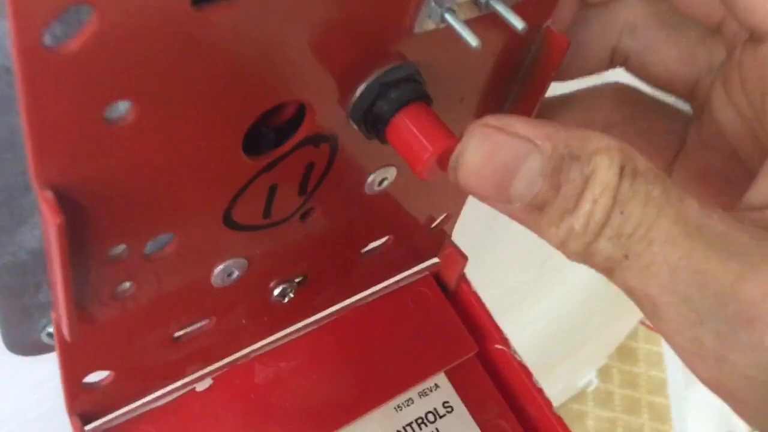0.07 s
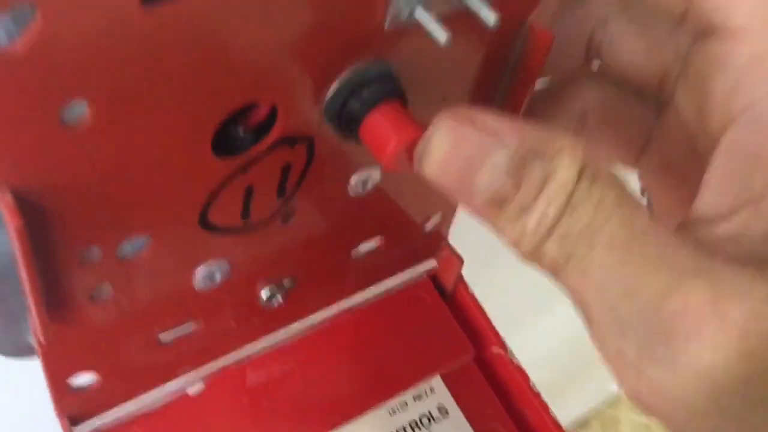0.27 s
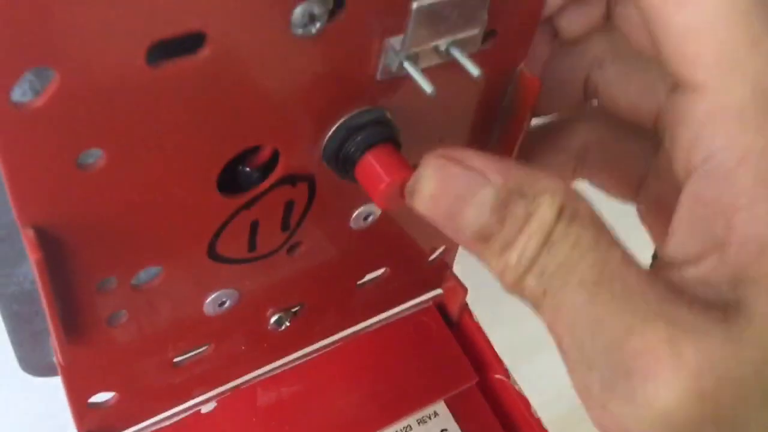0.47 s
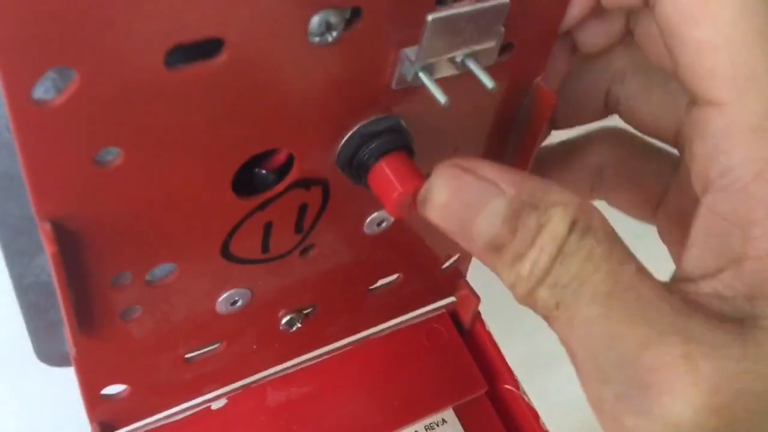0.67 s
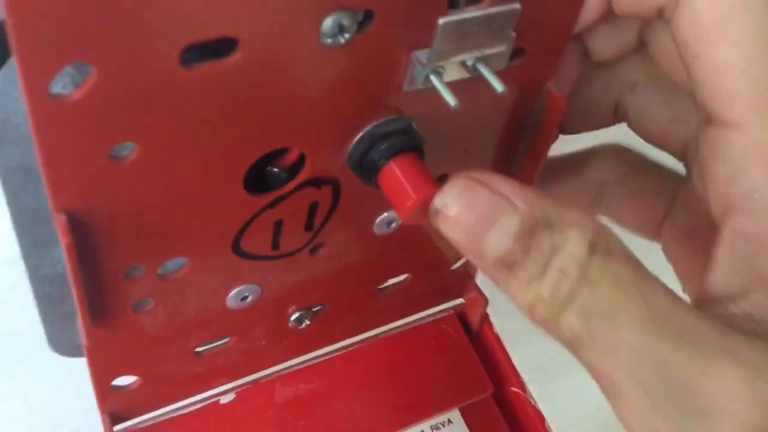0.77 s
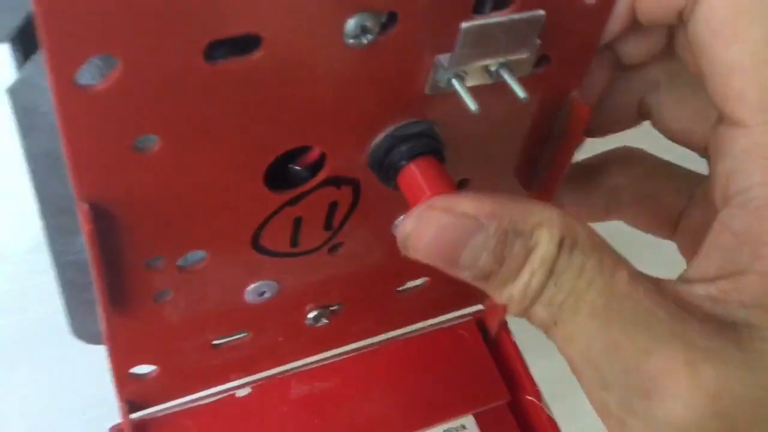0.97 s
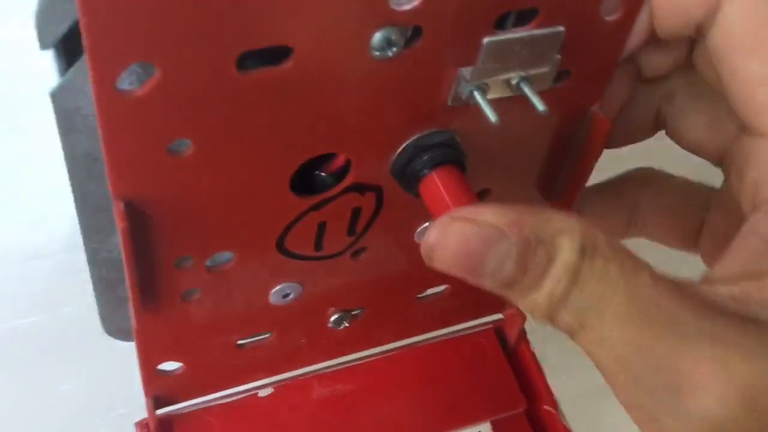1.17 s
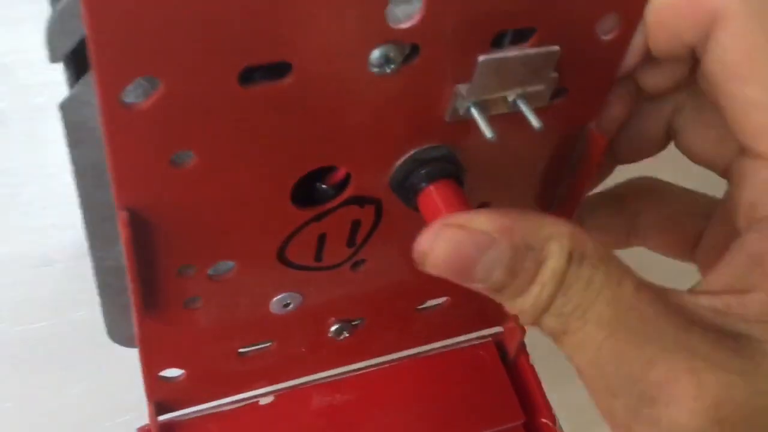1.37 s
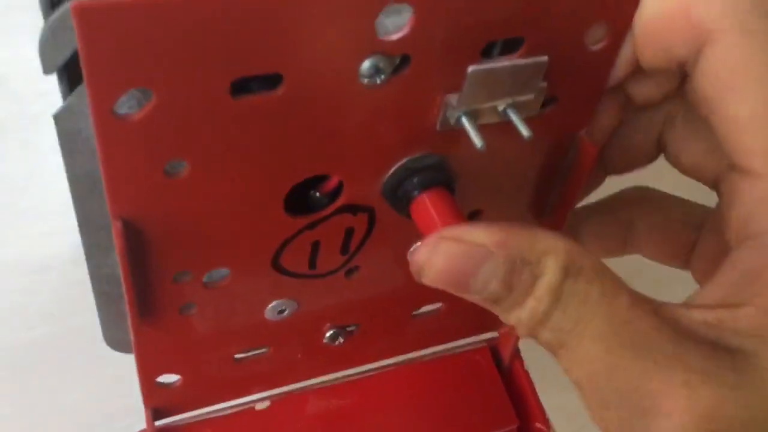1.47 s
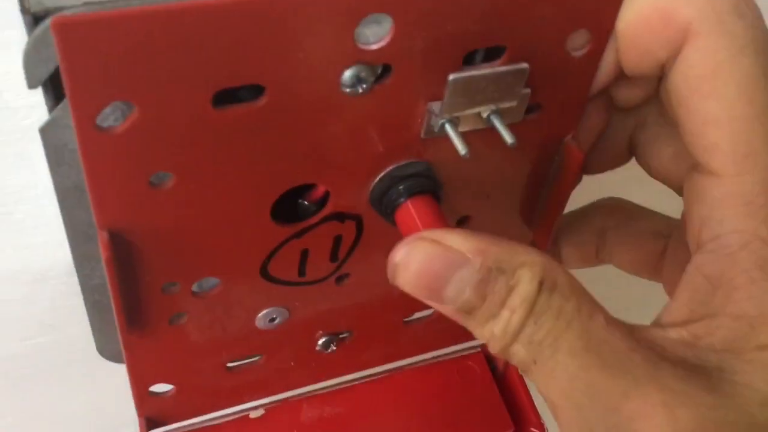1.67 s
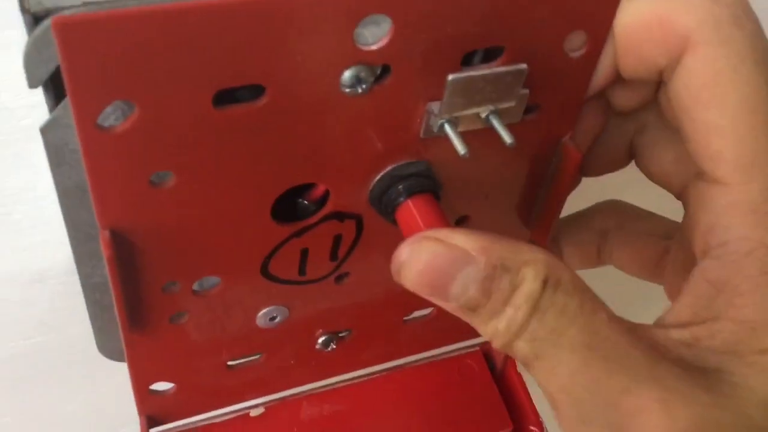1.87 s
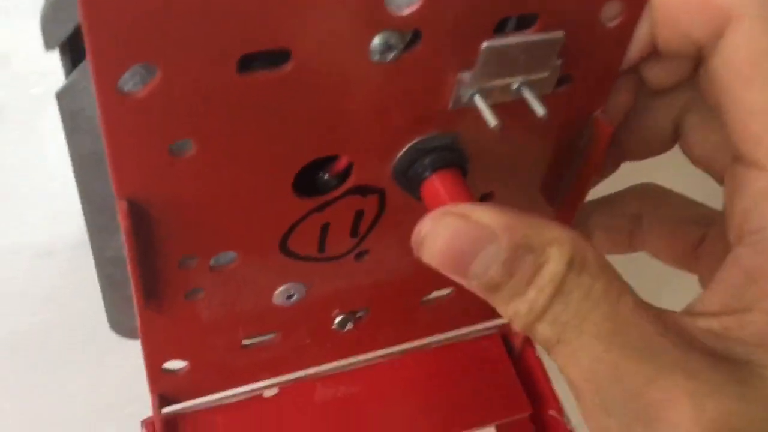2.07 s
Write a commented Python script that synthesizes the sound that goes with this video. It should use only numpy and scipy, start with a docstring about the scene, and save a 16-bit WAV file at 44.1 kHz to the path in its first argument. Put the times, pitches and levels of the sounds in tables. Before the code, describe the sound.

A small spring-loaded push button clicks down and up ten times in quick succession.

```python
"""A small room, close on a hand-held sheet-metal box: a thumb works its spring-loaded button ten times.
The contact snaps with a ringing click going down and a brighter, drier one coming up. Each snap
knocks the panel and thumps the box, and each release leaves the coil spring sizzling faintly.
Now and then the thumb taps the plunger. A short room tail and a low room tone sit behind it all."""
import sys
import numpy as np
from scipy import signal
from scipy.fft import rfft, irfft
from scipy.io import wavfile

SR = 44100
rng = np.random.default_rng(int(sys.argv[2]) if len(sys.argv) > 2 else 0)


def master(y):
    """Save y as 16-bit WAV."""
    cut = np.clip(np.atleast_2d(y).T, -1, 1)
    pcm = np.round(cut * 32767)  # scale
    wavfile.write(sys.argv[1], SR, pcm.astype(np.int16))


N = 94021
AGE = np.arange(SR // 4) / SR   # seconds since a blow


def from_db(db):
    """Decibels to gain."""
    return 10 ** (np.asarray(db) / 20)


def at_hz(points, hz):
    """Read a curve on a log-frequency axis."""
    point_hz, value = np.transpose(points)
    return np.interp(np.log(np.maximum(hz, 1)), np.log(point_hz), value)


def at_level(x, db):
    """Scale a blow so that its energy, packed into 10 ms, has this rms level."""
    return x * from_db(db) / np.sqrt(np.sum(x ** 2) / (SR / 100))


def add(out, start_s, sound):
    """Mix a sound in at a time."""
    i = max(int(start_s * SR), 0)
    out[i:i + len(sound)] += sound[:N - i]


def noise(colour, size):
    """Noise of the given colour, rms 1."""
    hz = np.arange(size // 2 + 1) * SR / size
    phases = np.exp(2j * np.pi * rng.random(len(hz)))
    x = irfft(from_db(at_hz(colour, hz)) * phases, size)
    return x / x.std()


def envelope(rise_s, t60, hold_s=0):
    """A linear attack on an exponential decay that starts at hold_s."""
    return np.minimum(AGE / rise_s, 1) * from_db(-60 * np.maximum(AGE - hold_s, 0) / t60)


def ring(modes, rise_s, detune=.002, hold_s=0):
    """One blow on a set of modes; strength, pitch and phase vary a little from blow to blow."""
    out = 0
    for hz, db, t60 in modes:
        gain = from_db(db + 1.1 * rng.normal())
        pitch_hz = hz * (1 + detune * rng.normal())
        phase = .85 * rng.normal()
        out += gain * envelope(rise_s, t60, hold_s) * np.sin(2 * np.pi * pitch_hz * AGE + phase)
    return out


# colour of the room tone: (frequency [Hz], relative density [dB])
ROOM_TONE_COLOUR = [(20, -29.5), (60, -9.5), (131, 0), (179, -25), (355, -12), (461, -26), (700, -14),
                    (822, -26.5), (1760, -40.5), (7470, -43), (16000, -45)]

def room_tone():
    """A steady bed of low rumble with a trace of hiss."""
    return from_db(-59) * noise(ROOM_TONE_COLOUR, N)


# colour of the reverb: (frequency [Hz], gain [dB])
REVERB_COLOUR = [(150, -7.5), (300, -4), (480, -13), (700, -9), (1200, -13), (2100, -16), (2850, -14),
                 (3600, -20.5), (4600, -20), (5750, -21), (7000, -21), (12300, -18.5), (15500, -28)]
# length of the reverb: (frequency [Hz], t60 [s])
REVERB_DECAY = [(150, 0.66), (1000, 0.28), (3000, 0.32), (6000, 0.33), (14000, 0.1)]

def reverb(send, onset_s=.001):
    """The walls return a diffuse tail, each band with its own level and decay."""
    t, tail = np.arange(SR // 2) / SR, 0
    edges_hz = np.linspace(7, 130, 34) ** 2
    for low, high in zip(edges_hz, edges_hz[1:]):
        hz = np.sqrt(low * high)
        bandpass = signal.butter(2, [low, high], "band", fs=SR, output="sos")
        band = signal.sosfilt(bandpass, rng.standard_normal(len(t)))
        band *= np.minimum(t / onset_s, 1) ** 2 * from_db(-60 * t / at_hz(REVERB_DECAY, hz))
        to_unity = np.sqrt(2 * (high - low) / SR / np.sum(band ** 2))
        tail += band * to_unity * from_db(at_hz(REVERB_COLOUR, hz))
    return signal.fftconvolve(send, tail)[:N]


def spring_sizzle(releases, centre_hz=12900, half_width_hz=610):
    """Set free at each release, the coil spring sizzles on, well under the click's treble."""
    out, hz = np.zeros(N), np.fft.rfftfreq(len(AGE), 1 / SR)
    rolloff = np.hypot(1, ((hz - centre_hz) / half_width_hz) ** 2)
    for start_s, _, treble_db, _, _ in releases:
        coils = irfft(rfft(rng.standard_normal(len(AGE))) / rolloff, len(AGE))
        add(out, start_s, at_level(coils * envelope(rise_s=.02, t60=.3), treble_db - 35.5))
    return out


# the thumb meets the plunger: (time [s], level [dB])
THUMB_TAPS = [(0.1458, -32), (0.155, -47), (0.902, -35), (0.923, -43.5), (1.579, -39.5), (1.699, -50.5)]
# colour of a tap: (frequency [Hz], relative density [dB])
THUMB_COLOUR = [(100, 23), (400, 5.5), (1700, 9.5), (3500, 1), (7000, -9.5), (16000, -6)]

def thumb_taps():
    """Dull little taps as the plunger takes up its slack."""
    out = np.zeros(N)
    for start_s, db in THUMB_TAPS:
        tap = noise(THUMB_COLOUR, len(AGE)) * envelope(rise_s=.0014, t60=.047)
        add(out, start_s, from_db(db) * tap)
    return out


# knock of the sheet-metal panel: (frequency [Hz], relative level [dB])
KNOCK_MODES = [(690, -11), (1050, -4), (1189, 2), (1260, -5), (1437, -2), (1660, -5), (1860, -6),
               (2130, -8)]
# thump of the box: (frequency [Hz], relative level [dB], t60 [s])
THUMP_MODES = [(125, -7, .06), (160, -2, .08), (230, 1, .04), (288, 2, .075), (375, -3, .045)]
# the box rocks in the hand: (frequency [Hz], relative level [dB], t60 [s])
ROCK_MODE = [(88.5, 0, 0.039)]
# it rocks more once the grip eases: (time [s], level [dB])
ROCK_LEVEL = [(0.7, -60.5), (1.05, -47)]

def box_body(start_s, knock_db, thump_db, rise_s=.0025, panel_t60=.045, grip_detune=.025):
    """The weight under a click: the panel knocks, the box thumps and rocks in the hand."""
    knock = ring([(hz, db, panel_t60) for hz, db in KNOCK_MODES], rise_s)
    thump = ring(THUMP_MODES, rise_s, grip_detune)
    rock = ring(ROCK_MODE, rise_s=.01, detune=grip_detune)
    rock_db = np.interp(start_s, *np.transpose(ROCK_LEVEL))
    return at_level(knock, knock_db + 3) + at_level(thump, thump_db + 8.5) + at_level(rock, rock_db)


def contact_snaps(cues, modes, crack_colour, crack_db, crack_t60, rise_s):
    """The contact chatters, cracks, rings and jolts the box. Returns direct sound and reverb send."""
    chatter_s, body_lag_s = .0015, .001298
    crossover_hz, treble_fade_db_per_s = 5000, 520
    lowpass = signal.butter(3, crossover_hz, "low", fs=SR, output="sos")
    highpass = signal.butter(3, crossover_hz, "high", fs=SR, output="sos")
    direct, send = np.zeros((2, N))
    for start_s, ring_db, treble_db, knock_db, thump_db in cues:
        # the crack stands for the dense, quickly dying modes of the small parts
        crack = from_db(crack_db) * noise(crack_colour, len(AGE)) * envelope(rise_s, crack_t60, chatter_s)
        tone = ring(modes, rise_s, hold_s=chatter_s)
        body = box_body(start_s, knock_db, thump_db)
        for bus, tone_db in ((direct, 0), (send, -4)):   # less of the ring reaches the room
            click = crack + from_db(tone_db) * tone
            low = signal.sosfilt(lowpass, click)
            treble = signal.sosfilt(highpass, click) * from_db(-treble_fade_db_per_s * AGE)
            add(bus, start_s, at_level(low, ring_db - 11) + at_level(treble, treble_db - 5))
            add(bus, start_s + body_lag_s, body)
    return np.array([direct, send])


# downstrokes, levels relative within each layer: (time [s], ring [dB], treble [dB], knock [dB], thump [dB])
DOWN_CUES = [(0.203, -16.5, -19.5, -50, -47.5), (0.4017, -15, -17.5, -50.5, -48),
             (0.603, -18, -18.5, -51, -48), (0.9483, -16, -19.5, -48.5, -48),
             (1.164, -14.5, -20.5, -45.5, -46.5), (1.3172, -15, -22.5, -45, -48.5),
             (1.4551, -16, -22.5, -44, -48.5), (1.6006, -16.5, -20.5, -49, -49.5),
             (1.8579, -15, -21, -48, -47), (1.9927, -17, -20.5, -49.5, -48)]
# ring of the switch going down: (frequency [Hz], relative level [dB], t60 [s])
DOWN_MODES = [(2132, -19, .025), (2680, -7, .032), (2907, -6, .034), (3250, -11, .036), (3499, -2, .027),
              (3740, -8, .027), (4107, -15, .025), (4385, -12, .028), (5040, -18, .03), (5550, -4, .024),
              (5700, 1, .03), (8130, -14, .018), (9000, -15, .034), (9260, -10, .034), (10250, -12, .016),
              (10900, -11, .018), (11633, -14, .02), (12200, -15, .016), (13580, -13, .016),
              (14669, -16, .016)]
# colour of its crack: (frequency [Hz], relative density [dB])
DOWN_CRACK = [(300, -12.5), (600, -17), (1600, -8.5), (2700, 0), (3600, -4), (5700, -2.5), (6800, -8.5),
              (12500, -7.5), (16000, -4)]

def button_down():
    """The contact snaps down under the thumb with a ringing click."""
    return contact_snaps(DOWN_CUES, DOWN_MODES, DOWN_CRACK, crack_db=-5.5, crack_t60=.032, rise_s=.0012)


# upstrokes, levels relative within each layer: (time [s], ring [dB], treble [dB], knock [dB], thump [dB])
UP_CUES = [(0.3148, -19.5, -17, -42, -45.5), (0.5183, -17.5, -15.5, -43, -45.5),
           (0.6959, -17.5, -16.5, -44.5, -48), (1.0788, -22.5, -20, -40, -48.5),
           (1.2488, -22.5, -19.5, -41.5, -48.5), (1.3996, -22, -20.5, -41.5, -49),
           (1.5327, -22, -20, -42.5, -46.5), (1.7882, -20.5, -20, -43, -47.5),
           (1.9314, -17.5, -19.5, -43.5, -49), (2.0734, -19, -17, -41, -49.5)]
# ring of the switch coming up: (frequency [Hz], relative level [dB], t60 [s])
UP_MODES = [(3499, -14, .024), (3741, -15, .024), (4107, -9, .022), (4375, -1, .029), (4895, -3, .031),
            (5090, -11, .026), (5630, -6, .025), (6115, -16, .036), (7030, -7, .028), (7450, -9, .024),
            (7820, -15, .06), (8170, -3, .018), (9200, -11, .04), (10212, -7, .022), (11192, 2, .016),
            (11644, 1, .021), (12333, -3, .024), (12958, -6, .028), (13550, -1, .018), (14158, -6, .016)]
# colour of its crack: (frequency [Hz], relative density [dB])
UP_CRACK = [(300, -5), (700, -21), (1700, -6.5), (2700, -9), (4500, 3.5), (6300, -1.5), (7500, 5),
            (12500, 5.5), (16000, 0)]

def button_up():
    """The contact springs back with a brighter, drier click."""
    return contact_snaps(UP_CUES, UP_MODES, UP_CRACK, crack_db=.5, crack_t60=.04, rise_s=.0014)


def scene():
    """The button up front, the room behind it, in mono."""
    direct, send = button_down() + button_up() + thumb_taps()
    return (direct + spring_sizzle(UP_CUES) + reverb(send) + room_tone())[None]


def record(dry, low_cut_hz=48, high_cut_hz=15600):
    """The microphone drops the deep bass; a steep filter cuts the top."""
    x = signal.sosfilt(signal.butter(4, low_cut_hz, "high", fs=SR, output="sos"), dry)
    return signal.sosfilt(signal.ellip(8, .5, 70, high_cut_hz, fs=SR, output="sos"), x)


dry = scene()
out = record(dry)
master(out)
```